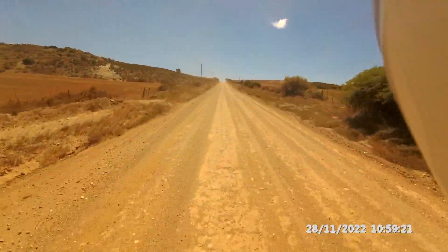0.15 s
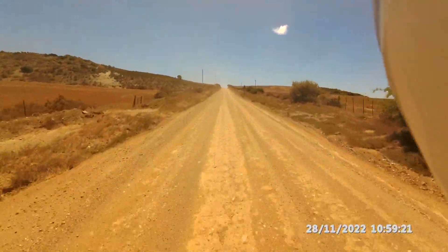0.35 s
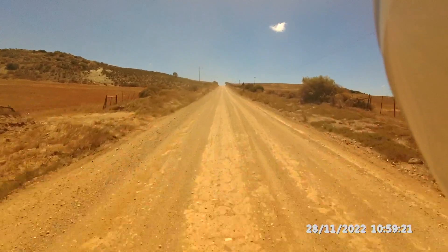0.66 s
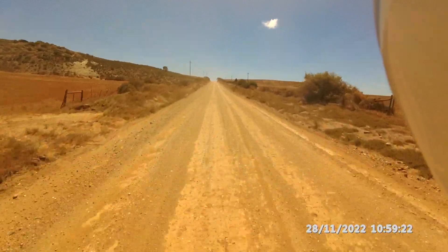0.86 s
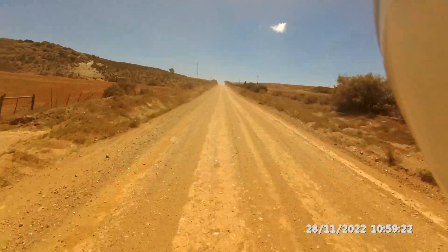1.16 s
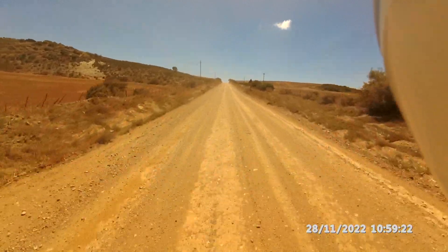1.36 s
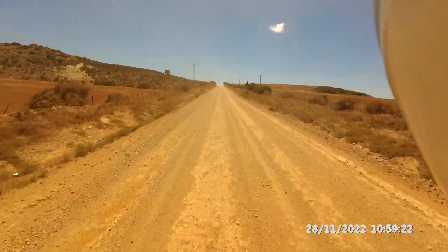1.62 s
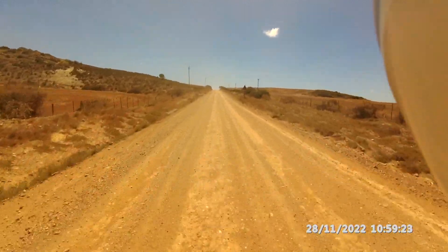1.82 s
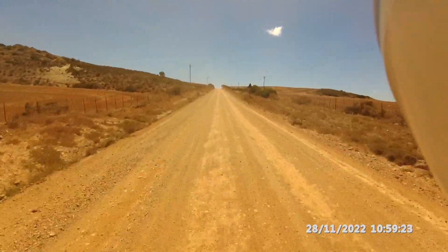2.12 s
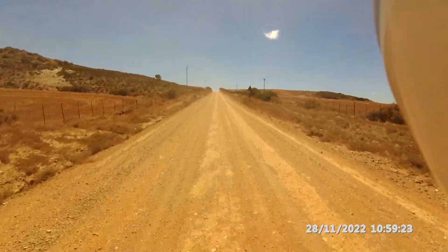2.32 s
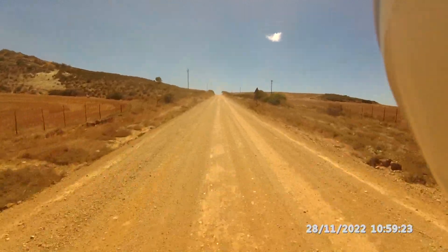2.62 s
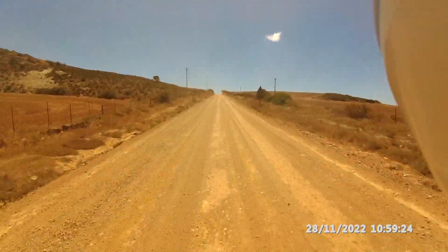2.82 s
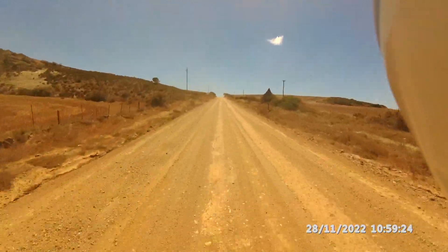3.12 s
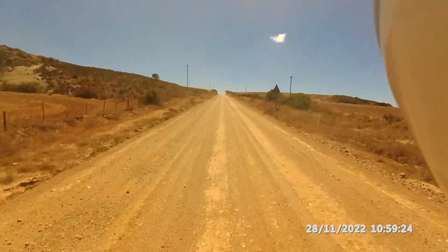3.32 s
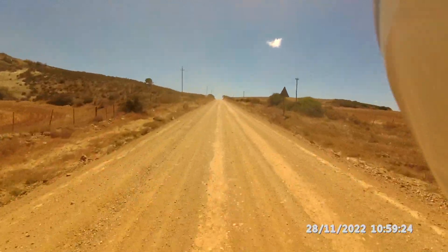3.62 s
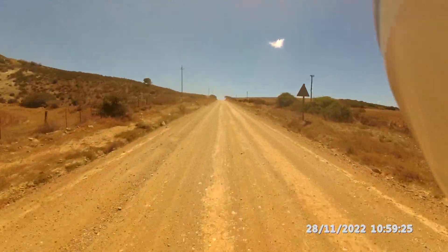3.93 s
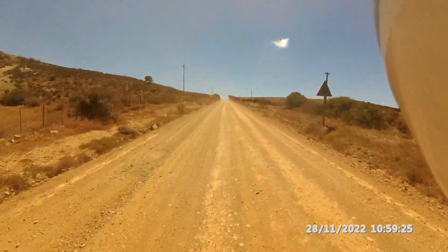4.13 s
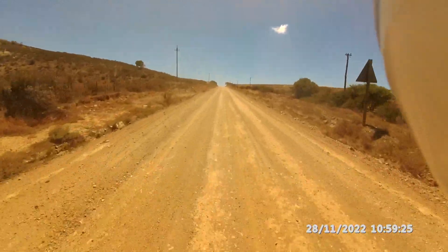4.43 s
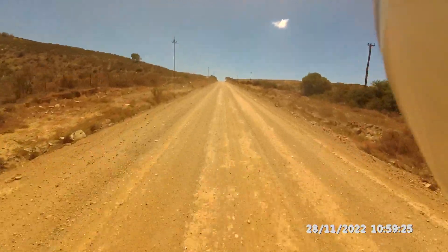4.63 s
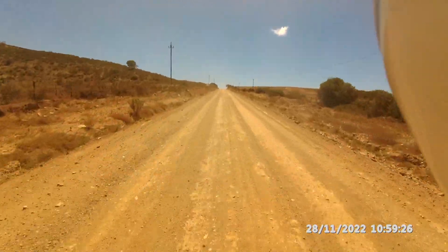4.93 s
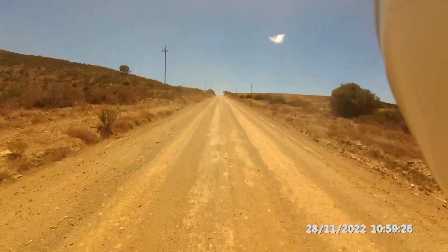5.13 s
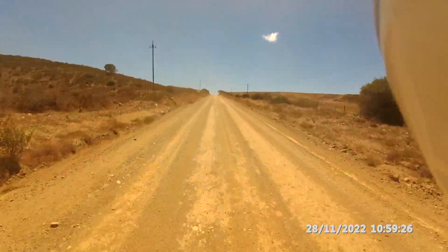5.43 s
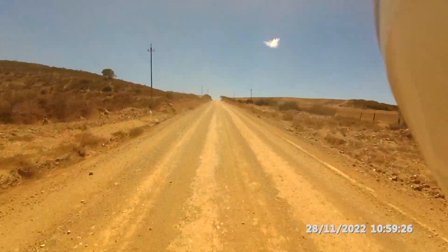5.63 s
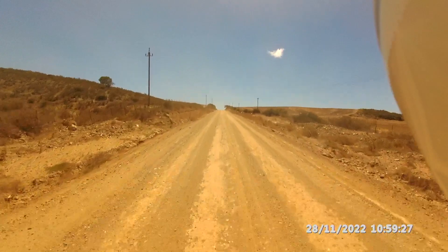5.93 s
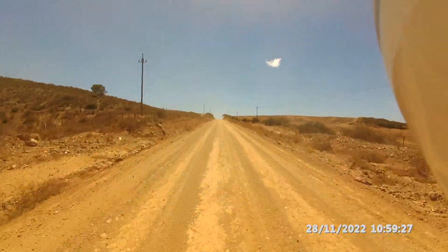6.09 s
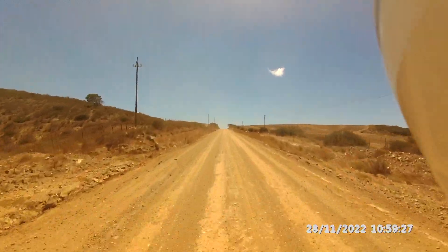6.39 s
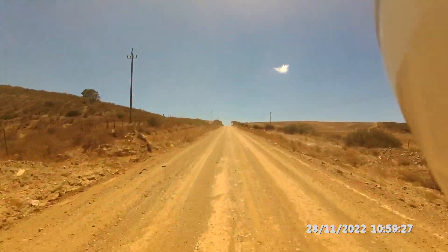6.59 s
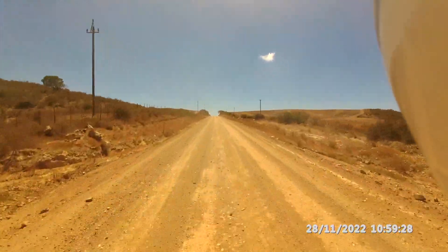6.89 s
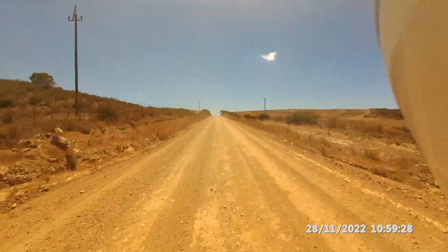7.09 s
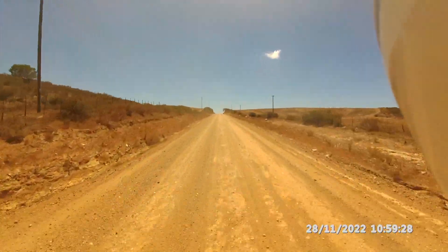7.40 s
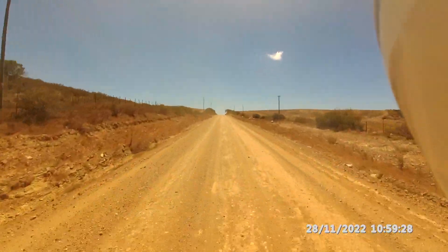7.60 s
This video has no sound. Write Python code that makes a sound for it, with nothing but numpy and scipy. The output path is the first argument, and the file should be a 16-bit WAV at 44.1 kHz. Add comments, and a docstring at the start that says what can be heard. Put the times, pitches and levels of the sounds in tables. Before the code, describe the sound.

A motorcycle rides at constant speed on loose gravel. Close, nearly mono sound, heavy in bass: fluttering wind thumps, dull tyre rumble, fine gravel hiss and a faint engine drone with a thin whirr. Pebbles tick at the start, a rough patch swells and knocks the mount near the middle, then steadier riding carries isolated crisp snaps of grit to the end, without stopping.

```python
"""A motorcycle cruises along a gravel road, heard from a microphone mounted behind its screen.
Throughout, shaped noise gives buffeting wind and roaring, crunching tyres over a hum of engine harmonics.
Decaying pings give the stones that tick on the bike, thickest on the loose first stretch.
Near four seconds the road is rough: the tyres roar, the air surges and bumps shake the mount.
From about five seconds a few grains of grit, sharp clicks with a push and a ping, snap at the microphone."""
import sys
import numpy as np
from scipy import signal
from scipy.fft import rfft, irfft, next_fast_len
from scipy.io import wavfile
from scipy.ndimage import uniform_filter1d

SR = 44100
rng = np.random.default_rng(int(sys.argv[2]) if len(sys.argv) > 2 else 0)


def dump_mix(stems):
    """Bounce the given channels to the path in sys.argv[1] as a 16-bit WAV at rate SR."""
    frames = np.atleast_2d(stems).T  # one column per channel
    limited = np.clip(frames, -1, 1)  # hard clip at full scale
    pcm = np.round(limited * 32767).astype(np.int16)
    wavfile.write(sys.argv[1], SR, pcm)


N = 341775
TIME = np.arange(N) / SR  # s
EDGE_HZ = 15800  # upper band limit

# hiss of fine gravel thrown from under the tyres: [t/s, level/dB]
SPRAY = [(0, -59), (.3, -56), (.85, -57.5), (1.35, -58), (1.55, -59), (2.4, -58), (3.3, -57), (3.93, -53),
         (4.5, -57), (5.1, -55), (5.4, -57.5), (6.3, -59), (6.75, -59), (7.3, -55), (7.75, -58.5)]
# spectrum of a hard contact between grains: [f/Hz, relative level/dB]
CONTACT_COLOUR = [(100, -13), (400, 12), (800, -7), (1500, -8), (2800, -4.5), (4300, -8), (6000, -9.5),
                  (7700, -11), (9800, -13), (11500, -12.5), (15500, -18)]


def gain_of(db):
    """The decibel law: level to amplitude ratio."""
    return 10 ** (np.asarray(db) / 20)


def evened(x):
    """Normalisation of mean power: scales to rms 1."""
    return x / np.sqrt(np.mean(x ** 2) + 1e-20)


def read(points, hz):
    """Spectral interpolation: straight lines in dB over log frequency."""
    f, value = np.transpose(points)
    return np.interp(np.log(hz + 1), np.log(f + 1), value)


def curve(rows):
    """Linear interpolation in time: a table of [t/s, value] at every sample."""
    return np.interp(TIME, *np.transpose(rows))


def add(mix, s, sound):
    """Superposition: adds a sound to the mix in place, starting at s seconds."""
    part = mix[max(round(s * SR), 0):][:len(sound)]
    part += sound[:len(part)]


def low_pass(x, hz, order, run=signal.sosfilt):
    """Low-pass filtering: keeps what lies below hz."""
    return run(signal.butter(order, hz, fs=SR, output="sos"), x)


def shaped(gain):
    """Spectral shaping: white noise times a gain over frequency, at rms 1."""
    size = next_fast_len(N)
    spectrum = rfft(rng.standard_normal(size)) * gain(np.fft.rfftfreq(size, 1 / SR))
    return evened(irfft(spectrum, size)[:N])


def noise(colour):
    """Coloured noise: a tabled spectrum, rolled off steeply at the band limit."""
    return shaped(lambda hz: gain_of(read(colour, hz)) / (1 + (hz / EDGE_HZ) ** 20))


def wander(rate_hz):
    """Random modulation: noise of rms 1 confined below about rate_hz."""
    return shaped(lambda hz: np.exp(-(hz / rate_hz) ** 2))


def ringing(modes):
    """Resonance: noise filtered by a sum of modal peaks [f/Hz, width/Hz, relative level/dB]."""
    return shaped(lambda hz: sum(gain_of(db) / (1 + (2 * (hz - f) / width) ** 2) for f, width, db in modes))


def steadied(x, seconds, share):
    """Envelope compression: divides out a share of the running power in dB."""
    power = uniform_filter1d(x ** 2, max(int(seconds * SR), 1))
    return evened(x / (abs(power) + 1e-9) ** (np.clip(share, 0, 1) / 2))


def octave_band(size, hz, octaves):
    """Band-pass response: a Gaussian over log frequency with the given standard deviation."""
    f = np.fft.rfftfreq(size, 1 / SR)
    return np.exp(-.5 * (np.log2((f + 1) / hz) / octaves) ** 2)


def decay(t, hz, cycles):
    """Modal damping: an exponential decay of quality factor cycles."""
    return np.exp(-np.pi * hz * t / cycles)


def swell(t, rise_s):
    """Critically damped response: rises to 1 at rise_s, then dies away."""
    return t / rise_s * np.exp(1 - t / rise_s)


def impulse(colour, size=1024):
    """Minimum phase: a causal click of peak 1 with a tabled spectrum."""
    log_gain = np.log(gain_of(read(colour, abs(np.fft.fftfreq(size, 1 / SR)))))
    click = np.fft.ifft(np.exp(np.conj(signal.hilbert(log_gain)))).real
    return click / abs(click).max()


def rebound(click, earliest_s, latest_s, db):
    """Repeated impact: the same click again, weaker, a random instant later."""
    gap_s = earliest_s + (latest_s - earliest_s) * rng.random()
    gap = max(int(SR * gap_s), 1)
    return click + gain_of(db) * np.pad(click, (gap, 0))[:len(click)]


def wind(buffet_db=-27, follow=0.95, lumpy_db=1.15, deep_hz=85, rush_db=-31, flutter_db=1.28):
    """Turbulence: large eddies thump the housing in gusts; smaller ones rush over it and flutter."""
    # force of the air relative to cruising: [t/s, level/dB]
    air_force = [(0, 2), (.22, 5), (.45, 5), (.65, 1), (.97, 2), (1.3, 0.5), (1.65, -1.5), (2.45, 1.5),
                 (2.7, 1.5), (3.35, 4.5), (4.02, 5), (4.5, -1), (5.02, 2), (5.33, -0.5), (5.8, -0.5),
                 (6.35, -3), (7.3, 2.5), (7.75, 0)]
    # spectrum of the large eddies: [f/Hz, relative level/dB]
    buffet_colour = [(20, -47), (38, -56), (50, -36), (62, -15.5), (74, -7.5), (102, -1.5), (135, -3),
                     (175, -16), (260, -31.5), (600, -79)]
    # spectrum of the rushing air: [f/Hz, relative level/dB]
    rush_colour = [(60, -51), (130, -3.5), (190, 2), (255, -2), (330, -7), (430, -11.5), (600, -28.5),
                   (1500, -74)]
    air = curve(air_force)
    gust_db, deep_db = gusts()
    eddies = steadied(noise(buffet_colour), seconds=0.058, share=0.43)
    deep = low_pass(eddies, deep_hz, order=3, run=signal.sosfiltfilt)
    thumps = eddies - deep + deep * gain_of(deep_db)
    # follow: dB of buffeting per dB of air force
    buffet = thumps * gain_of(buffet_db + follow * air + gust_db + lumpy_db * wander(11))
    rush = steadied(noise(rush_colour), seconds=0.29, share=0.9)
    return buffet + rush * gain_of(rush_db + air + flutter_db * wander(27))


def gusts():
    """Slow unsteadiness of the flow: cosine-squared arches raise or lower the buffeting, in dB."""
    # gusts and lulls: [crest t/s, length/s, rise/dB, extra rise of the deepest part/dB]
    gust_table = [(.05, 0.89, 0.5, 4), (1.122, 0.29, -5, -3), (1.438, 0.18, -5, -3), (1.533, 0.21, 0, 6),
                  (1.738, 0.14, -5, -5), (1.905, 0.26, 6, -4), (2.14, 0.27, 2, 3), (2.36, 0.35, -4, -9),
                  (2.566, 0.2, 2, -12), (2.764, 0.21, -4, -8), (3.1, 0.42, -2, -2),
                  (3.602, 0.97, -3.5, -2.5), (4.097, 0.61, 2, 2.5), (4.546, 0.15, 4, 2),
                  (4.75, 0.18, 5.5, 1), (4.957, 0.31, 4, 5.5), (5.25, 1, -1, 8.5), (5.685, 0.079, -10, 0),
                  (6.17, 0.23, -1, 12), (6.65, .24, -6, 6)]
    arches = []
    for s, length, _, _ in gust_table:
        phase = np.clip((TIME - s) / length, -.5, .5)
        arches.append(np.cos(np.pi * phase) ** 2)
    return np.transpose([row[2:] for row in gust_table]) @ np.array(arches)


def surges(octaves=0.37):
    """Band-limited turbulence: air tears past the housing, swelling and dying in one arch."""
    # surges: [crest t/s, length/s, level/dB, centre f/Hz]
    surge_table = [(0.091, 0.17, -42.5, 840), (.2, .16, -28, 215), (1.088, 0.071, -27.5, 210),
                   (2.452, 0.085, -28.5, 194), (3.028, 0.16, -31, 347), (3.322, 0.093, -29, 283),
                   (3.608, .2, -33, 330), (3.895, 0.13, -25, 260), (4.04, 0.17, -23, 202),
                   (4.315, .1, -26.5, 212), (4.98, .26, -29.5, 202), (5.079, 0.17, -35.5, 377),
                   (7.213, .12, -44, 840), (7.501, .5, -39, 338), (7.653, .1, -41, 825)]
    out = np.zeros(N)
    for s, length, db, hz in surge_table:
        t = TIME[:max(int(length * SR), 64)]
        air = irfft(rfft(rng.standard_normal(SR)) * octave_band(SR, hz, octaves), SR)[:len(t)]
        arch = np.sin(np.pi * t / length) ** 2
        surge = np.sqrt(np.mean(arch ** 2)) * evened(air * arch)
        add(out, s - length / 2, gain_of(db) * surge)
    return out


def tyres(roar_db=-39, jolt_db=1.0, spray_jolt_db=0.7, crackle_db=1.5, bright_hz=800, brighten=0.24):
    """Roughness excitation: rougher road makes the tread louder and brighter; fine gravel hisses."""
    # roughness relative to smooth gravel: [t/s, level/dB]
    roughness = [(0, 1), (.33, 2.5), (.6, 0), (.98, 0.5), (1.6, -1.7), (2.9, 1.4), (3.08, 3.5), (3.38, 2),
                 (3.55, 5.5), (3.78, 5.5), (3.98, 6.5), (4.55, -0.5), (4.9, 1.5), (5.03, 2.5), (5.33, -1.5),
                 (6.35, -1), (6.8, 0.7), (7.3, 3.5), (7.75, 1)]
    # spectrum of the tread: [f/Hz, relative level/dB]
    roar_colour = [(150, -10), (400, -2), (520, -2), (655, -3.5), (780, -2.5), (900, -5.5), (980, -10),
                   (1100, -9), (1400, -17), (1800, -30), (3000, -35), (6000, -59.5)]
    # spectrum of the thrown gravel: [f/Hz, relative level/dB]
    gravel_colour = [(600, -5.5), (1600, 3.5), (2300, -3.5), (2900, -16.5), (3400, -3.5), (4000, -12.5),
                     (4700, -14), (5500, -16.5), (7000, -18.5), (9000, -23), (15000, -19.5)]
    jolt, road = wander(43), curve(roughness)
    tread = noise(roar_colour)
    body = low_pass(tread, bright_hz, order=3, run=signal.sosfiltfilt)
    # the body gains less than the treble as roughness grows
    tilted = body * gain_of(-brighten * road) + tread - body
    roar = tilted * gain_of(roar_db + road + jolt_db * jolt)
    spray_db = curve(SPRAY) + spray_jolt_db * jolt + crackle_db * wander(300)
    return roar + noise(gravel_colour) * gain_of(spray_db)


def ridges(rise_s=0.038, knocks_per_s=900, octaves=0.54):
    """Filtered impulse train: a ridge of loose stones sends a fading volley of dull knocks through the tyre."""
    # ridges: [t/s, level/dB, centre f/Hz]
    ridge_table = [(.945, -41.5, 790), (2.955, -34, 483), (3.46, -36.5, 710), (3.53, -31.5, 370),
                   (3.62, -39.5, 840), (3.84, -31, 360), (4.985, -38, 760)]
    out, t = np.zeros(N), TIME[:SR // 3]
    for s, db, hz in ridge_table:
        knocks = (rng.random(len(t)) < knocks_per_s / SR) * rng.choice([-1, 1], len(t))
        dull = irfft(rfft(knocks) * octave_band(len(t), hz, octaves), len(t))
        add(out, s, gain_of(db) * swell(t, rise_s) * evened(dull))
    return out


def crunch(grains_per_s=300, spread_db=3.0, cycles=5.2, below_spray_db=-6.5,
           low_hz=1900, high_hz=4200, tilt_db=-5):
    """Random impacts: pebbles knock under the tread as tiny pings, fainter by tilt_db per octave up."""
    struck = rng.random(N) < grains_per_s / SR
    size = gain_of(spread_db * np.minimum(rng.exponential(1, N), 3)) * struck
    pitches = np.geomspace(low_hz, high_hz, 20)
    kind = rng.integers(0, len(pitches), N)
    t, out = TIME[:SR // 200], np.zeros(N)
    for k, hz in enumerate(pitches):
        ping = decay(t, hz, cycles) * np.sin(2 * np.pi * hz * t)
        knocks = signal.oaconvolve(size * (kind == k), ping)[:N]
        out += gain_of(tilt_db * np.log2(hz / low_hz)) * knocks
    return evened(out) * gain_of(curve(SPRAY) + below_spray_db)


def engine(beat=0.2, waver_db=1.5, rattle_db=0.5, whirr_flutter_db=.5, intake_db=-47):
    """Harmonics and resonance: firing orders hum, intake and casing ring, and a thin whirr varies."""
    # firing rate: [t/s, f/Hz]
    firing_rate = [(0, 51.2), (1.3, 50.4), (2.2, 51.4), (3.1, 51.4), (4.2, 50.6), (5.2, 50.8), (6.2, 50.4),
                   (7.75, 50.8)]
    # harmonics: [multiple of the firing rate, level/dB]
    orders = [(1, -51), (2, -40.5), (3, -43), (4, -46.5), (5, -47.5), (6, -51), (7, -54.5), (8, -57.5),
              (11, -58)]
    # modes of the casing: [f/Hz, width/Hz, relative level/dB]
    casing = [(1514, 53, 10.5), (2000, 120, -5.5), (2330, 120, -4.5), (2736, 440, -1), (3116, 260, -5.5)]
    # rattle of the casing: [t/s, level/dB]
    clatter_level = [(0, -57.5), (1.25, -58.5), (2.1, -60), (2.7, -59.5), (3.2, -58), (4, -58),
                     (5.6, -58.5), (6.3, -60), (7, -57.8), (7.75, -57)]
    # modes of the hollow intake: [f/Hz, width/Hz, relative level/dB]
    intake_modes = [(535, 33, -1), (587, 68, -2)]
    # modes of the metallic running gear: [f/Hz, width/Hz, relative level/dB]
    whirr_modes = [(4586, 470, 1), (7420, 420, -8)]
    # whirr of the running gear: [t/s, level/dB]
    whirr_level = [(0, -72.5), (.95, -76), (1.5, -71), (2.5, -72.5), (3.1, -69.5), (3.6, -71),
                   (3.92, -66.5), (4.55, -71.5), (5.05, -67.5), (5.55, -73), (6.4, -68.5), (6.7, -71),
                   (7.1, -69), (7.75, -70.5)]
    firings = np.cumsum(curve(firing_rate) * (1 + 0.00348 * wander(5.5))) / SR  # running count
    hum = np.zeros(N)
    for k, db in orders:
        tone = np.sqrt(2) * np.cos(2 * np.pi * (k * firings + rng.random()))
        hum += gain_of(db + waver_db * wander(2.8)) * tone
    pulsing = 1 + beat * np.cos(2 * np.pi * firings)  # one pulse a firing
    clatter = evened(ringing(casing) * pulsing) * gain_of(curve(clatter_level) + rattle_db * wander(60))
    intake = ringing(intake_modes) * gain_of(intake_db)
    whirr = ringing(whirr_modes) * gain_of(curve(whirr_level) + whirr_flutter_db * wander(13))
    return hum + intake + clatter + whirr


def bumps(rise_s=0.0064):
    """Damped oscillation: each bump rocks the mount for a few cycles."""
    # bumps: [t/s, level/dB, f/Hz]
    bump_table = [(0.031, -18, 95), (0.293, -17, 104), (0.437, -19, 100), (.955, -15.5, 204),
                  (1.3, -16, 94), (2.938, -20, 105), (3.973, -11, 110), (4.021, -11, 116), (4.06, -14, 130),
                  (4.145, -15, 103), (4.224, -22, 103), (4.548, -13, 105), (4.967, -17, 92),
                  (5.351, -14, 101), (6.292, -13, 113)]
    out, t = np.zeros(N), TIME[:SR // 10]
    for s, db, hz in bump_table:
        add(out, s, gain_of(db) * swell(t, rise_s) * np.sin(2 * np.pi * hz * t))
    return out


def stones(ring_cycles=1.55, edge_db=-8, stray_per_s=30, stray_db=-43.5, loose_per_s=130, loose_s=0.2):
    """Impact: thrown stones tick and skip on the bike, among faint random chips, thickest at first."""
    # stones: [t/s, level/dB, f/Hz], small ones sounding higher
    stone_table = [(.0657, -30, 2400), (.0755, -33, 3100), (.092, -39, 6500), (.117, -30, 2500),
                   (.123, -36, 4200), (0.168, -30, 3500), (.2298, -31, 3600), (.232, -40, 5000),
                   (0.241, -25, 1900), (0.248, -29, 2100), (.258, -39, 5500), (0.3105, -34, 3400),
                   (.5155, -39, 3000), (.6313, -33, 2600), (.77, -40, 4200), (1.067, -34, 3300),
                   (1.2644, -31.5, 2800), (4.137, -35, 5400), (4.698, -34, 2800), (4.9752, -32, 4600),
                   (6.58, -35, 5000)]
    # spectrum of a chip: [f/Hz, relative level/dB]
    chip_colour = [(400, -8.5), (1500, 27), (3500, -10), (5000, -14), (8000, -16), (11000, -26),
                   (15000, -29)]
    hits, t = np.zeros(N), TIME[:SR // 100]
    edge = impulse(CONTACT_COLOUR)[:len(t)]
    for s, db, hz in stone_table:
        ping = decay(t, hz, ring_cycles) * np.sin(2 * np.pi * hz * t)
        tick = ping + gain_of(edge_db) * edge
        add(hits, s, gain_of(db) * rebound(tick, earliest_s=.0005, latest_s=0.002, db=-8.5))
    chips_per_s = stray_per_s + loose_per_s * np.exp(-(TIME / loose_s) ** 2 / 2)
    chips = (rng.random(N) < chips_per_s / SR) * (2 * rng.random(N) - 1)
    return hits + gain_of(stray_db) * signal.oaconvolve(chips, impulse(chip_colour))[:N]


def grit(push_s=0.00019, ping_cycles=3.3):
    """Contact transient: a grain gives a double edge, a short push and a damped ping of its own pitch."""
    # grains: [t/s, snap level/dB, push level/dB, ping f/Hz, ping level/dB]
    grain_table = [(5.147, -23.5, -27, 8000, -38), (5.1538, -31, -33, 6200, -34),
                   (5.1555, -23, -30, 5200, -35), (5.1716, -20, -45, 7500, -38),
                   (5.1777, -28, -32, 6300, -33), (5.1792, -27, -40, 7000, -42),
                   (5.8464, -22.5, -26, 3000, -45), (5.8485, -29, -39, 2000, -43),
                   (6.074, -16, -19, 4360, -38), (7.1981, -23, -28, 2600, -47),
                   (7.3475, -25, -33, 1900, -37)]
    out, snap = np.zeros(N), impulse(CONTACT_COLOUR)
    t = TIME[:len(snap)]
    u = t / push_s
    push = u * (2 - u) * np.exp(1 - u)  # out and back, with no net area
    for s, db, push_db, hz, ping_db in grain_table:
        edges = rebound(snap, earliest_s=0.00011, latest_s=.0004, db=-8)
        ping = decay(t, hz, ping_cycles) * np.cos(2 * np.pi * hz * t)
        add(out, s, gain_of(db) * edges + gain_of(push_db) * push + gain_of(ping_db) * ping)
    return out


def scene(lead_hz=50, port_hz=9, side_grit=0.03):
    """Interchannel phase: nearly mono, the bass a little ahead on the left; grit sits close to the middle."""
    snaps = grit()
    air = wind() + surges()
    road = tyres() + ridges() + crunch()
    middle = air + road + engine() + bumps() + snaps + stones()
    # well above port_hz this low-pass lags by a quarter cycle
    lag = lead_hz / port_hz * low_pass(middle, port_hz, order=1)
    side = lag + side_grit * snaps
    return np.array([middle - side, middle + side])


def record(dry, low_cut_hz=50, hiss_db=-70):
    """Band limitation: the microphone cuts the deepest rumble and adds hiss; then the treble is cut."""
    # spectrum of the hiss: [f/Hz, relative level/dB]
    hiss_colour = [(2000, -20), (6400, 2), (6900, 3), (8000, -3), (9700, -7), (11500, 0), (14600, 5),
                   (15200, 0), (16000, -28)]
    heard = signal.sosfilt(signal.butter(6, low_cut_hz, "high", fs=SR, output="sos"), dry)
    hiss = gain_of(hiss_db) * noise(hiss_colour)  # the same in both channels
    edge = signal.firwin(511, EDGE_HZ, window=("kaiser", 9), fs=SR)
    return signal.oaconvolve(heard + hiss, edge[None], "same")


dry = scene()
out = record(dry)
dump_mix(out)
```